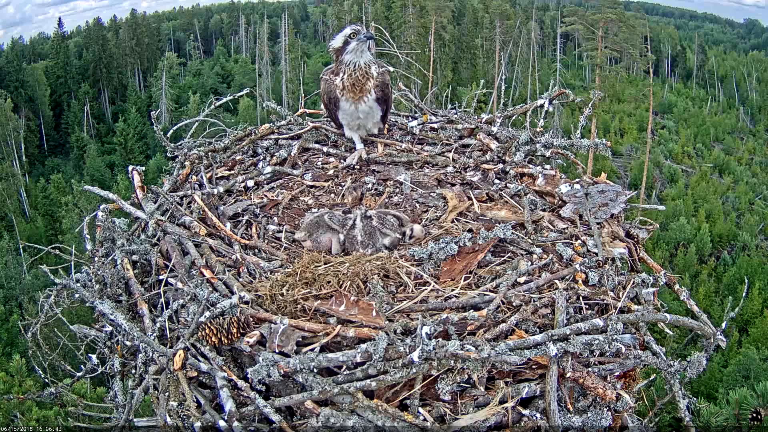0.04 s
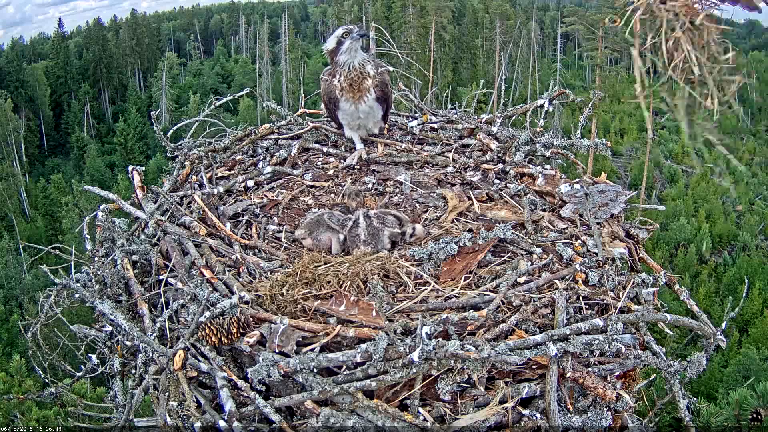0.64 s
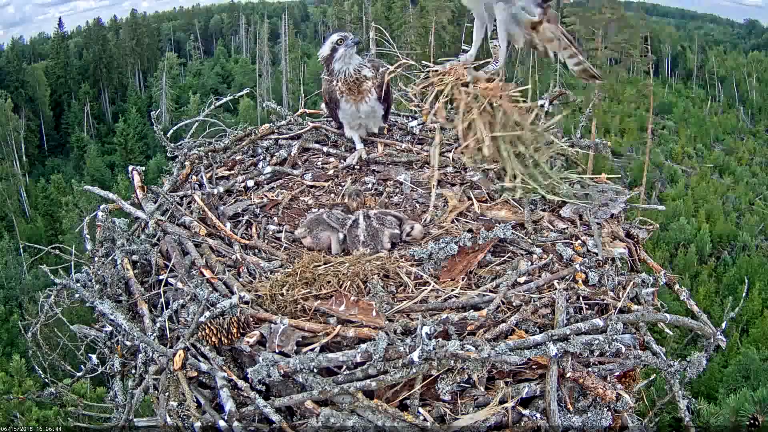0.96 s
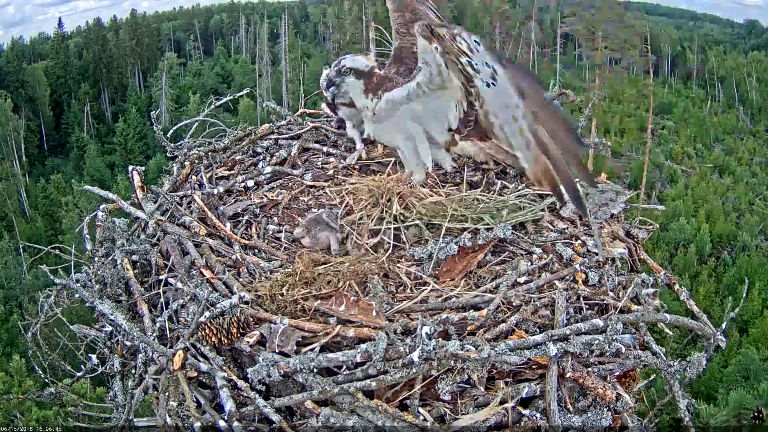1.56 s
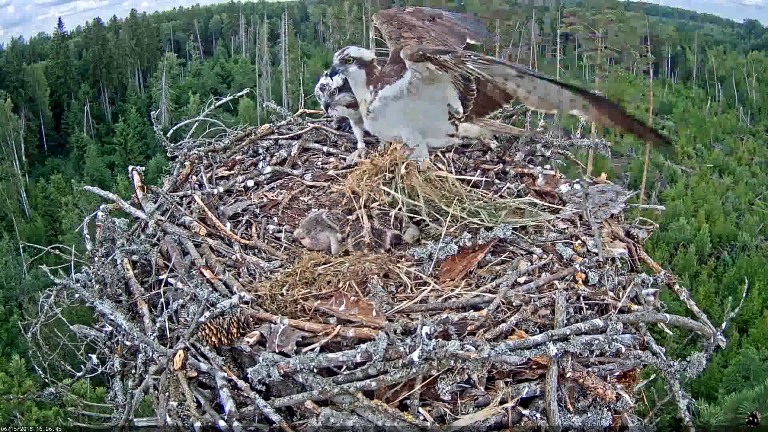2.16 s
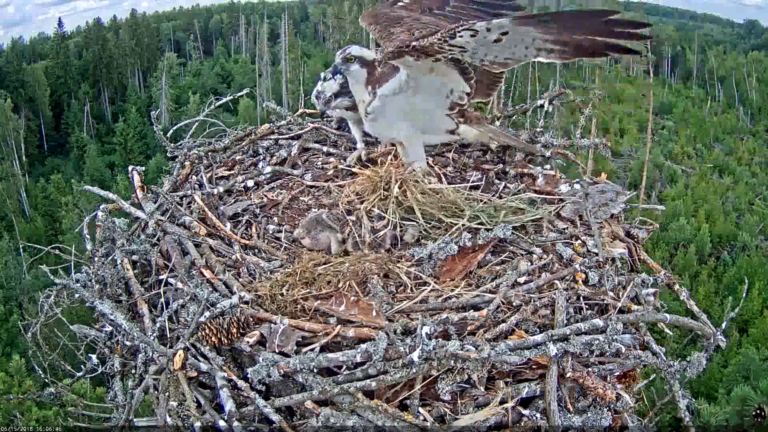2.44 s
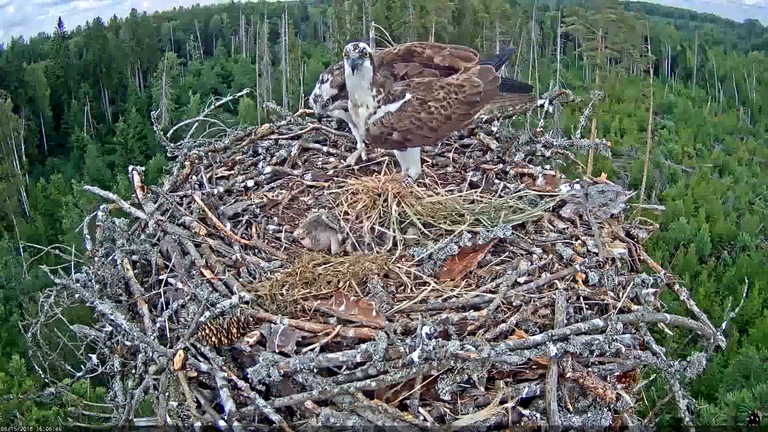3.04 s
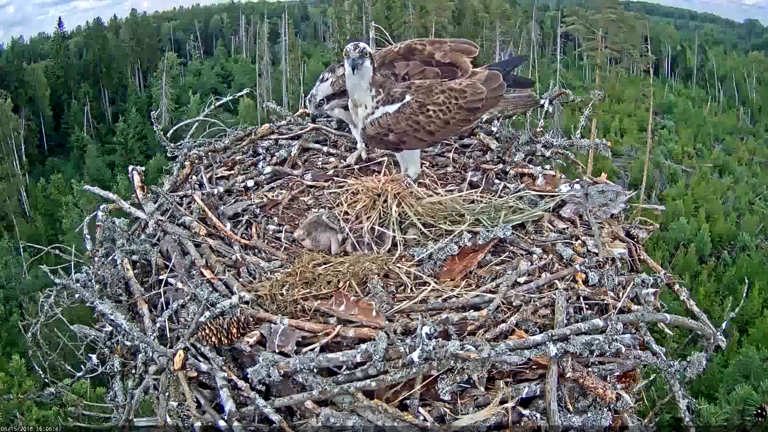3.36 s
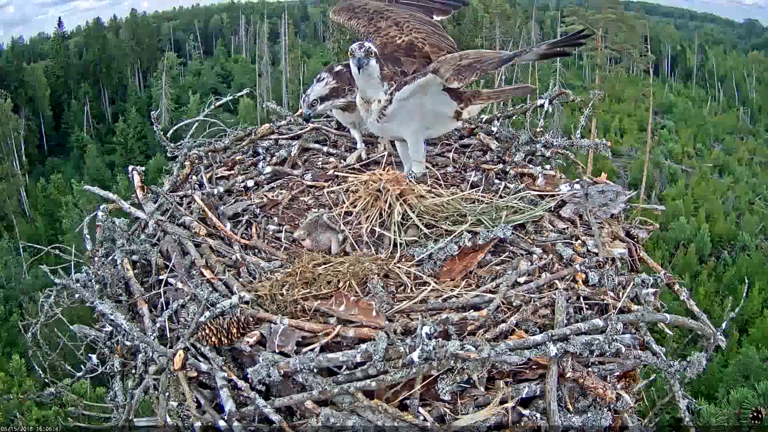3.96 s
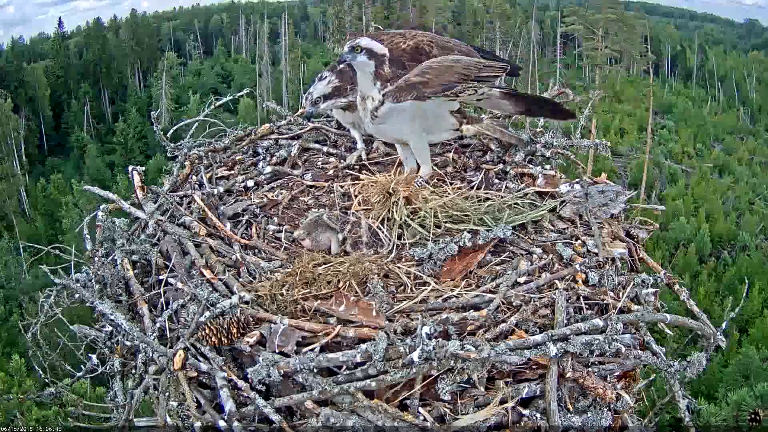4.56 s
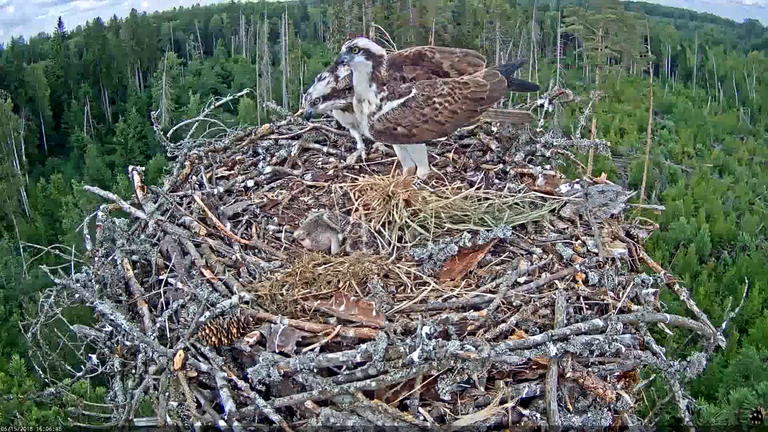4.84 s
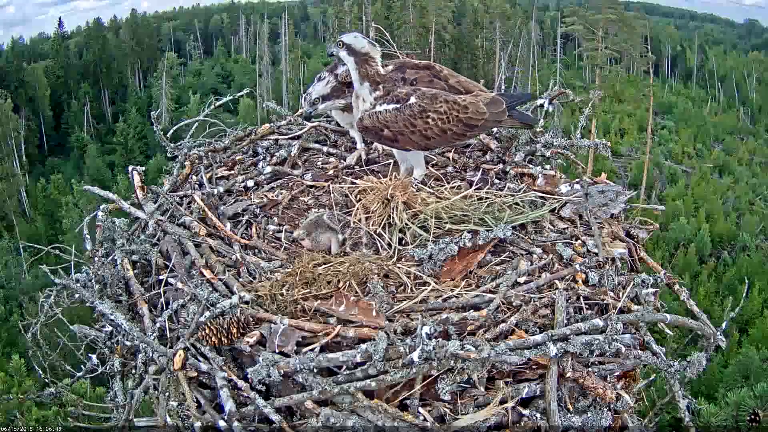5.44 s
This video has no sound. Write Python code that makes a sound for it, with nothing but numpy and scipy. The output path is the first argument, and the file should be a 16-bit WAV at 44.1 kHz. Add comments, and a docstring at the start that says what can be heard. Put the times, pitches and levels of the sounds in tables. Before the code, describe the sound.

From the start, an osprey's wingbeats push air at a close microphone, seven low thumps at about five a second, with whooshing, wind rumble and a few tiny snaps. Short, high falling yelps sound at the very beginning and near 0.5 and 1.2 seconds. At about 1.4 seconds the bird lands on the stick nest and the buffeting dies away. Feathers and straw rustle softly, with more yelps near 2.3, 2.9 and 3.6 seconds and very faint distant hoots between 2.3 and 3.2. From 3.7 seconds to the end at about 5.5, eight high, slightly raspy whistled chirps come close by, about four a second, growing louder. Beneath them are more rustling, a few soft knocks on the nest, a faint forest songbird and thin peeps near 5.3 seconds. Leaves hiss quietly throughout, and a low breeze rises toward the end.

```python
"""An osprey lands on a stick nest high above a forest, close to a fixed microphone, amid falling yelps
and then a run of louder whistled chirps, all voiced by the birds' vibrating syrinx membranes.
Its wingbeats push air at the microphone until touchdown; then feathers and straw rustle as it settles.
Behind the nest are thin peeps, a far songbird, faint hoots, hissing leaves and a rising breeze."""
import sys
import numpy as np
from scipy import signal
from scipy.fft import rfft, irfft
from scipy.io import wavfile

SR = 44100
rng = np.random.default_rng(int(sys.argv[2]) if len(sys.argv) > 2 else 0)


def dump(signal):
    """Clip the signal to [-1, 1] and save it as 16-bit WAV at the path in sys.argv[1]."""
    limited = np.clip(np.atleast_2d(signal).T, -1, 1)
    pcm = np.round(limited * 32767).astype(np.int16)
    wavfile.write(sys.argv[1], SR, pcm)


N = 246959
TIME = np.arange(N) / SR

# resonances of the throat and open bill: frequency_hz, gain_db
THROAT = [(2600, 0.5), (2950, -1.5), (3500, -1), (5150, -5.5), (5600, -16), (6400, -1.5), (7600, -0.5),
          (9200, 8.5), (10200, -13.5), (14000, -8)]
def osprey_calls():
    """Yelps and chirps at the nest, close to the microphone, shaped by the throat and bill."""
    return filtered(yelps() + chirps(), THROAT)


# the hoarse hiss that ends a yelp: frequency_hz, gain_db
HUSK_COLOUR = [(600, -25.5), (1200, 0), (2700, -1.5), (4500, -15.5), (14000, -32.5)]
# close yelps: start_s, hold_s, end_s, first_hz, last_hz, start_db, end_db, octave_db
YELPS = [(.021, 0.0021, 0.043, 2280, 1925, -19.5, -24.5, -20),
         (.511, 0.017, .581, 4150, 1805, -13, -28.5, -33),
         (1.179, .006, 1.231, 3460, 1793, -37.5, -19.5, -26),
         (2.276, 0.0016, 2.333, 2830, 1815, -16.5, -27.5, -22),
         (2.919, 0.0013, 2.977, 2693, 1800, -22, -18.5, -18), (3.631, 0, 3.66, 2090, 1730, -26, -32.5, -20)]
def yelps(glide_s=0.01, sag_hz_per_s=4820, off_tune_db=-13, husk_db=-46.5):
    """Short calls that drop fast, then sag, gaining level as the pitch enters the throat's resonance."""
    out, husk = np.zeros(N), np.zeros(N)
    for start, hold, end, first_hz, last_hz, start_db, end_db, octave_db in YELPS:
        t = np.arange(start, end, 1 / SR)
        falling = np.maximum(t, start + hold)
        sag = sag_hz_per_s * (end - falling)
        hz = swoop(falling, first_hz - sag[0], last_hz, glide_s) + sag
        db = np.linspace(start_db, end_db, len(t)) + off_tune_db * np.clip((hz - 2500) / 600, 0, 1)
        voice = syrinx(hz, octave_db, rasp_db=-33.5, upper_db=-13, flutter_db=2.7, hiss_db=-4.5)
        add(out, start, amp(db) * fade(t, 0.018, 0.012) * voice)
        husk += swell(end, half_s=0.027)
    return out + amp(husk_db) * husk * noise(HUSK_COLOUR)


# close chirps: start_s, crest_s, first_hz, held_hz, crest_hz, onset_db, crest_db, octave_db
CHIRPS = [(3.738, 3.746, 2370, 2330, 2293, -30, -24, -9.5),
          (3.89, 3.963, 2180, 2016, 2400, -22, -19, -13.5),
          (4.121, 4.195, 2372, 2353, 2506, -17, -15.5, -8.5),
          (4.399, 4.457, 2186, 2286, 2452, -22, -16, -10),
          (4.666, 4.722, 2145, 2193, 2379, -33.5, -17, -13),
          (4.909, 4.991, 2126, 2190, 2473, -28, -13.5, -11), (5.151, 5.246, 2334, 2173, 2512, -16, -14, -9),
          (5.403, 5.491, 2413, 2252, 2571, -13.5, -10, -7)]
def chirps(push_s=0.016, release_s=0.032, pitch_drop=0.176, weak_under_hz=2230, usual_crest_hz=2495):
    """Each chirp holds a note, a push of air flicks it to a brighter, raspier crest, and it falls."""
    out = np.zeros(N)
    for start, crest, first_hz, held_hz, crest_hz, onset_db, crest_db, octave_db in CHIRPS:
        t = np.arange(start, crest + release_s, 1 / SR)
        hold = ease((t - start) / max(crest - push_s - start, push_s))
        push = ease(1 + (t - crest) / push_s)
        release = np.clip((t - crest) / release_s, 0, 1)
        note_hz = first_hz + (held_hz - first_hz) * hold
        hz = (note_hz * (1 - push) + crest_hz * push) * (1 - pitch_drop * release ** 1.68)
        held_db = -21 - 0.065 * max(weak_under_hz - held_hz, 0)  # a note held too low barely sounds
        note_db = onset_db + (held_db - onset_db) * hold
        db = note_db * (1 - push) + crest_db * push - 5 * release ** 3
        bright_db = octave_db + 3 * (2 * push - 1) - 9 * release ** 4
        strain_db = 0.0257 * (crest_hz - usual_crest_hz)  # a higher crest takes a harder push
        rasp_db = -21.5 + strain_db + 6 * (push - 1) - 6 * release ** 2
        voice = syrinx(hz, bright_db, rasp_db, upper_db=-3.5 + 1.9 * push)
        add(out, start, amp(db) * fade(t, 0.011, 0.015) * voice)
    return out


def syrinx(hz, octave_db, rasp_db, upper_db, jitter=0.0034, flutter_db=1.42, hiss_db=-9):
    """A near-sine whistle with overtones; driven hard, alternate cycles differ and add half-harmonics."""
    size = len(hz)
    phase = 2 * np.pi * np.cumsum(hz * (1 + jitter * wander(size, 760))) / SR
    upper = sum(amp(db) * np.cos(k * phase) for k, db in ((3, -16), (4, -35), (5, -41)))
    overtones = np.cos(2 * phase) + amp(upper_db + 2 * wander(size, 90)) * upper
    halves = sum(amp(db + 4.2 * wander(size, 100)) * np.cos((k + .5) * phase)
                 for k, db in enumerate((-5.5, -2.5, -7.5, -23.5, -52.5)))
    turbulence = amp(hiss_db) * wander(size, 1300)
    hiss = turbulence * (np.cos(phase) + 1.1 * np.cos(2 * phase) + .12 * np.cos(3 * phase))
    rasp = amp(rasp_db + 2 * wander(size, 49)) * (halves + hiss)
    tone = np.cos(phase) + amp(octave_db) * overtones + rasp
    return np.sqrt(2) * tone * amp(flutter_db * wander(size, 120))


# whoosh of the wing tips and rush of air through the feathers: frequency_hz, gain_db
WHOOSH_COLOUR = [(40, 7), (130, 7), (300, 1), (600, 3), (1000, -5), (1700, -3), (3500, -16.5),
                 (6000, -25.5), (14000, -40)]
RUSH_COLOUR = [(40, 17.5), (150, 4), (700, 1), (1000, 1), (2200, -3.5), (4000, -8.5), (6000, -12),
               (10000, -13), (14000, -21.5)]
# strokes arriving at the microphone: peak_s, whoosh_delay_s, whoosh_db, whoosh_half_length_s
WINGBEATS = [(0.108, -0.024, -22, 0.011), (.324, -0.02, -23.5, 0.011), (0.532, -.014, -22, 0.0062),
             (0.75, 0.032, -30, 0.0086), (0.96, -0.0134, -19.5, 0.0039), (1.166, 0.052, -35.5, 0.01),
             (1.367, 0.045, -29.5, 0.011)]
def wings(width_s=0.0175, lean=0.27, peak=0.74, braking_db_per_s=1.5, slowing_s=0.27):
    """Each stroke sends suction, a push and suction again, with a fluttering whoosh from the tips."""
    pressure, whoosh = np.zeros(N), np.zeros(N)
    for s, delay, whoosh_db, half_s in WINGBEATS:
        u = (TIME - s) / width_s
        stroke = (1 - u ** 2) * (1 + lean * u) * np.exp(-u ** 2 / 2)
        pressure += amp(-braking_db_per_s * s) * stroke
        whoosh += amp(whoosh_db) * swell(s + delay, half_s)
    wake = amp(-26) * wander(N, 42)
    tips = whoosh * grainy_noise(WHOOSH_COLOUR, depth_db=2, rate_hz=490)
    rush_db = -42.5 + 10.5 * np.exp(-TIME / slowing_s)  # louder while the bird is still fast
    rush = amp(rush_db + 1.6 * wander(N, 60)) * noise(RUSH_COLOUR)
    return peak * pressure / pressure.max() + tips + flying() * (wake + rush)


def flying(landing_s=1.44, settle_s=0.054):
    """1 in flight, falling to 0 as the stirred air dies at touchdown."""
    return .5 - .5 * np.tanh((TIME - landing_s) / settle_s)


def downwash(gust_db=4, nearing_db_per_s=2):
    """Strength of the draught on the microphone: it surges with each stroke and grows as the bird nears."""
    gusts = sum(swell(s, half_s=0.044) for s, *_ in WINGBEATS)
    return flying() * amp(gust_db * gusts + nearing_db_per_s * TIME)


# feathers and straw at close range: frequency_hz, gain_db
RUSTLE_COLOUR = [(300, -18.5), (1300, 6.5), (3000, 4.5), (5000, 0), (7000, -4.5), (10000, -7.5),
                 (14000, -15.5)]
# wing shuffles and steps after the landing: peak_s, half_length_s, level_db
SHUFFLES = [(1.564, 0.062, -46), (1.901, 0.024, -44), (2.262, 0.054, -50), (2.9, 0.088, -57.5),
            (4.204, 0.31, -48.5), (4.53, .09, -47), (4.822, .06, -47.5), (5.5, .35, -53.5)]
def rustle(straw_db=-61.5):
    """Feathers and straw rub together; the nest is never quite still."""
    power = amp(straw_db) ** 2 + sum((amp(db) * swell(s, half_s)) ** 2 for s, half_s, db in SHUFFLES)
    return np.sqrt(power) * grainy_noise(RUSTLE_COLOUR, depth_db=3, rate_hz=1100)


# sharp clicks: start_s, relative_db
SNAPS = [(0.093, -24), (0.317, -24), (.958, -26), (1.401, -19)]
def snaps(decay_s=0.0004, gain_db=7.5):
    """A sharp click: a tiny burst of noise."""
    t, out = np.arange(SR // 20) / SR, np.zeros(N)
    for s, db in SNAPS:
        add(out, s, amp(db) * np.exp(-t / decay_s) * rng.standard_normal(len(t)))
    return amp(gain_db) * filtered(out, RUSTLE_COLOUR)


# resonances of one knock: pitch_hz, gain_db, t60_s
KNOCK_MODES = [(267, 6, 0.037), (540, 4, 0.018), (1150, -19, 0.0052), (1580, 14.5, 0.011),
               (2600, 4, 0.0063)]
# soft knocks on the nest: start_s, relative_db
KNOCKS = [(3.616, -57), (4.102, -41.5), (4.884, -45), (5.134, -40.5), (5.385, -38)]
def knocks():
    """A struck bill or twig rings in a few quickly damped modes."""
    t, out = np.arange(SR // 20) / SR, np.zeros(N)
    ring = sum(amp(db - 60 * t / t60) * np.sin(2 * np.pi * hz * t) for hz, db, t60 in KNOCK_MODES)
    for s, db in KNOCKS:
        add(out, s, amp(db) * ring)
    return out


# thin peeps, perhaps from the chicks: start_s, end_s, first_hz, last_hz, level_db
PEEPS = [(.701, .856, 2130, 2040, -42.5), (5.268, 5.296, 4700, 4380, -31.5),
         (5.301, 5.387, 4750, 4550, -47), (5.306, 5.345, 4700, 3100, -51),
         (5.337, 5.412, 1750, 2090, -50.5), (5.533, 5.612, 2300, 1650, -51)]
def peeps():
    """Faint gliding whistles behind the calls."""
    out = np.zeros(N)
    for start, end, first_hz, last_hz, db in PEEPS:
        add(out, start, whistle(start, end, first_hz, last_hz, db, glide_s=0.07, dying_db=4))
    return out


# song from far off in the forest: start_s, held_hz, level_db
SONG = [(3.036, 5080, -71), (3.156, 5240, -61.5), (3.194, 3440, -60), (3.54, 3990, -52), (3.89, 5200, -49),
        (3.938, 4120, -54), (4.227, 3993, -43.5), (4.568, 3440, -44), (4.921, 3414, -43)]
def songbird(top_hz=6830, note_s=0.19):
    """Each note is a quick downward slur that rings on."""
    out = np.zeros(N)
    for start, held_hz, db in SONG:
        add(out, start, whistle(start, start + note_s, top_hz, held_hz, db, glide_s=0.0075, dying_db=12.5))
    return out


def whistle(start, end, first_hz, last_hz, db, glide_s, dying_db, waver=0.01):
    """A pure tone that swoops and dies away."""
    t = np.arange(start, end, 1 / SR)
    hz = swoop(t, first_hz, last_hz, glide_s) * (1 + waver * wander(len(t), 120))
    gain = amp(db - dying_db * (t - start) / (end - start) + 2 * wander(len(t), 40))
    return np.sqrt(2) * gain * fade(t, 0.0058, 0.0092) * np.sin(2 * np.pi * np.cumsum(hz) / SR)


# faint hoots far off, perhaps a dove: start_s, end_s, level_db
HOOTS = [(2.33, 2.522, -56.5), (2.698, 2.882, -60.5), (2.957, 3.185, -65)]
def hoots(pitch_hz=442):
    """Soft low notes, blurred by distance."""
    out = np.zeros(N)
    for start, end, db in HOOTS:
        t = np.arange(start, end, 1 / SR)
        phase = 2 * np.pi * np.cumsum(pitch_hz * (1 + 0.012 * wander(len(t), 30))) / SR
        add(out, start, np.sqrt(2) * amp(db) * fade(t, .05, 0.084) * np.sin(phase))
    return out


# buffeting on the microphone, air around the nest and leaves below: frequency_hz, gain_db
RUMBLE_COLOUR = [(10, -15.5), (30, 6.5), (75, 2.5), (120, -6.5), (165, -2.5), (230, -16.5), (400, -23),
                 (900, -46)]
AIR_COLOUR = [(60, -5), (250, 3.5), (450, -1), (800, -3), (1500, -7), (4000, -18), (7000, -25),
              (14000, -34)]
LEAF_COLOUR = [(400, -4), (900, -20), (1300, 1.5), (1700, -3), (2400, 1.5), (3400, -3), (4600, -8.5),
               (6000, -33), (14000, -16.5)]
def wind(breeze_from_s=3.3, breeze_db_per_s=3, heave_db=4, lull_s=3.39):
    """A rising breeze and the bird's downwash add in power: buffeting, soft air and leafy hiss."""
    draught = downwash()
    rise_db = breeze_db_per_s * np.maximum(TIME - breeze_from_s, 0)
    lull_db = -13.5 * swell(lull_s, half_s=0.13)  # the hiss of the leaves drops briefly
    buffet = np.hypot(amp(-45 + rise_db), amp(-41) * draught)
    rumble = buffet * (noise(RUMBLE_COLOUR) + amp(heave_db) * wander(N, 8.3))
    air = np.hypot(amp(-58 + rise_db), amp(-44) * draught) * noise(AIR_COLOUR)
    leaves = np.hypot(amp(-54.5 + lull_db), amp(-53.5) * draught) * noise(LEAF_COLOUR)
    return rumble + air + leaves * amp(0.97 * wander(N, 11))


def forest_echo(x, echo_db=-30.5, t60_s=0.27, echoes_per_s=2000):
    """Trees below the nest scatter a faint tail back to the microphone."""
    t = np.arange(SR) / SR
    taps = rng.standard_normal(SR) * (rng.random(SR) < echoes_per_s / SR)
    taps *= amp(-60 * t / t60_s) * (t > .004)
    return amp(echo_db) * signal.fftconvolve(x, taps / np.linalg.norm(taps))[:N]


def amp(db):
    """Decibels to amplitude."""
    return 10 ** (np.asarray(db) / 20)


def unit(x):
    """Scales x to rms 1."""
    return x / np.sqrt(np.mean(x ** 2) + 1e-20)


def add(mix, start_s, sound):
    """Mixes a sound in at its start time."""
    part = mix[max(round(start_s * SR), 0):][:len(sound)]
    part += sound[:len(part)]


def filtered(x, colour):
    """Passes x through a spectrum of (frequency_hz, gain_db) points."""
    hz, db = np.transpose(colour)
    log_hz = np.log(np.fft.rfftfreq(N, 1 / SR) + 1)
    return irfft(rfft(x) * amp(np.interp(log_hz, np.log(hz), db)), N)


def noise(colour):
    """Steady coloured noise of rms 1."""
    return unit(filtered(rng.standard_normal(N), colour))


def grainy_noise(colour, depth_db, rate_hz):
    """Coloured noise of rms 1 whose level flickers."""
    grains = rng.standard_normal(N) * amp(depth_db * wander(N, rate_hz))
    return unit(filtered(grains, colour))


def wander(size, rate_hz):
    """Smooth random motion of rms about 1, rolling off above the rate."""
    hz = np.fft.rfftfreq(SR if size < SR else size + 1, 1 / SR)
    spectrum = rfft(rng.standard_normal(2 * len(hz) - 2))
    return unit(irfft(spectrum * np.exp(-(hz / rate_hz) ** 2)))[:size]


def swoop(t, first_hz, last_hz, glide_s):
    """Pitch relaxes toward its last value as the membrane's tension settles."""
    left = np.exp(-(t - t[0]) / glide_s)
    return last_hz + (first_hz - last_hz) * (left - left[-1]) / (1 - left[-1])


def swell(peak_s, half_s):
    """A smooth rise and fall, 1 at its peak."""
    return 1 / np.sqrt(1 + ((TIME - peak_s) / half_s) ** 4)


def ease(x):
    """A smooth step from 0 to 1."""
    return np.sin(np.pi / 2 * np.clip(x, 0, 1)) ** 2


def fade(t, rise_s, fall_s):
    """Soft start and end of a note."""
    return ease((t - t[0]) / rise_s) * ease((t[-1] - t) / fall_s)


def scene():
    """Mono, from beside the nest: the close calls are nearly dry, the thin whistles carry more echo."""
    calls = osprey_calls()
    whistles = songbird() + peeps()
    birds = calls + whistles + forest_echo(calls + amp(24.5) * whistles) + hoots()
    return (birds + wings() + rustle() + snaps() + knocks() + wind())[None]


def record(dry):
    """The microphone's small steady offset and its band limit."""
    offset, edge_hz = 0.045, 14100
    lowpass = signal.firwin(511, edge_hz, window=("kaiser", 9), fs=SR)
    return signal.oaconvolve(dry + offset, lowpass[None], "same")


dry = scene()
out = record(dry)
dump(out)
```